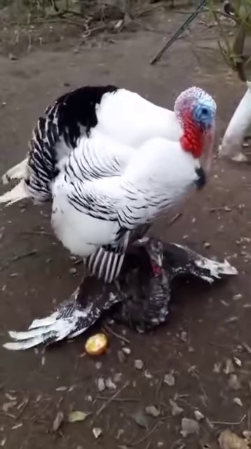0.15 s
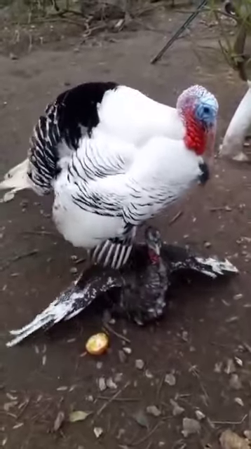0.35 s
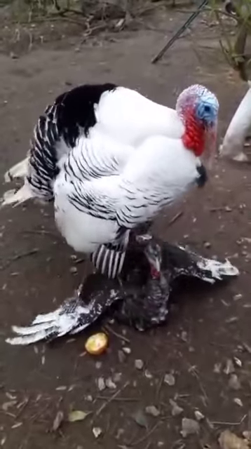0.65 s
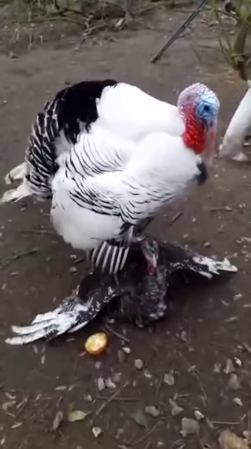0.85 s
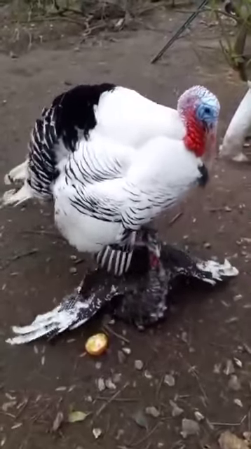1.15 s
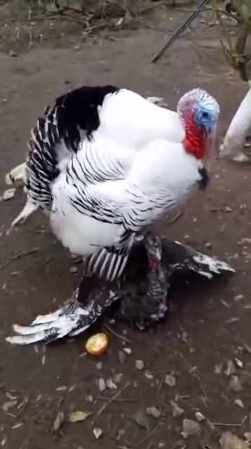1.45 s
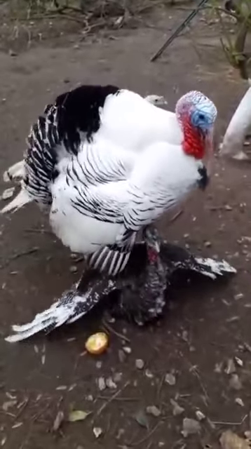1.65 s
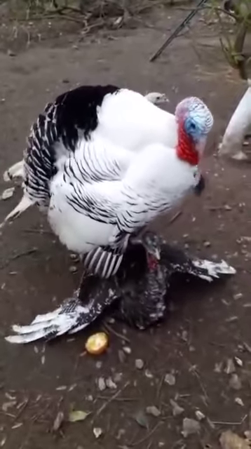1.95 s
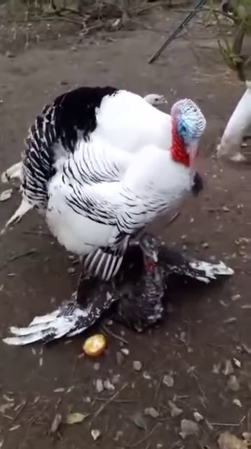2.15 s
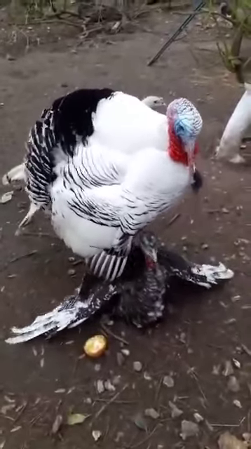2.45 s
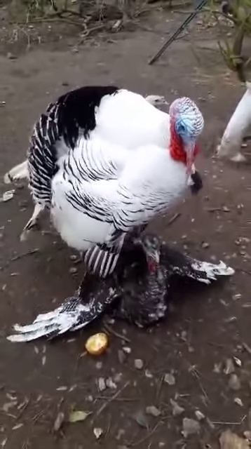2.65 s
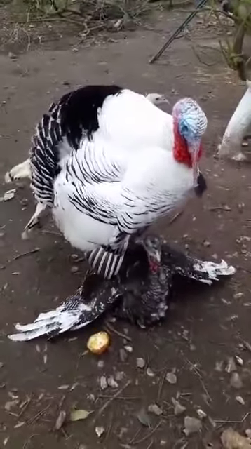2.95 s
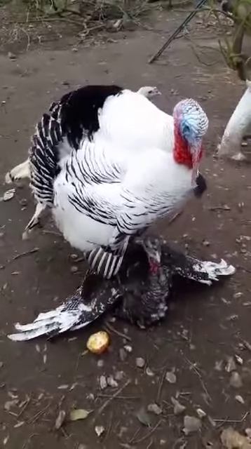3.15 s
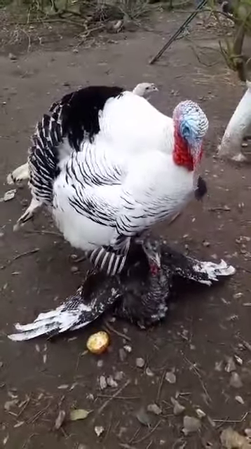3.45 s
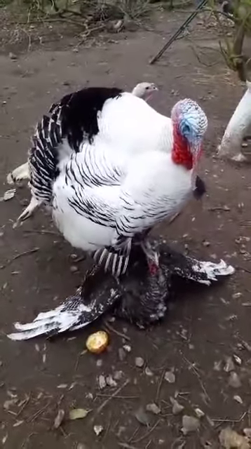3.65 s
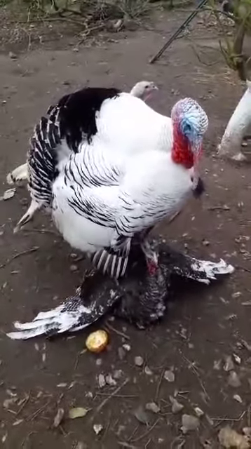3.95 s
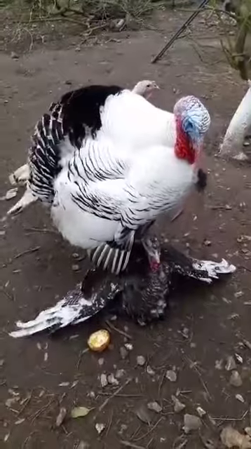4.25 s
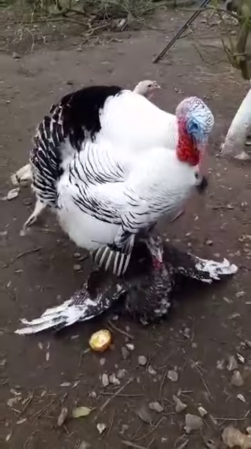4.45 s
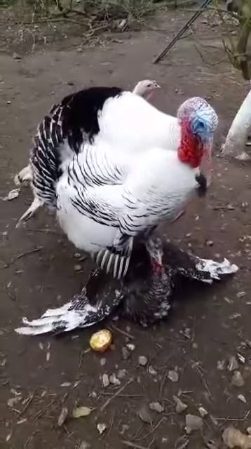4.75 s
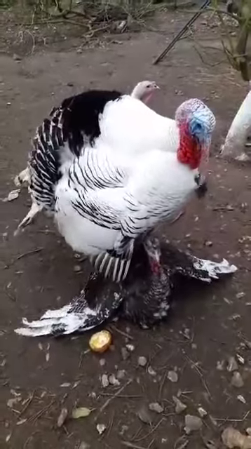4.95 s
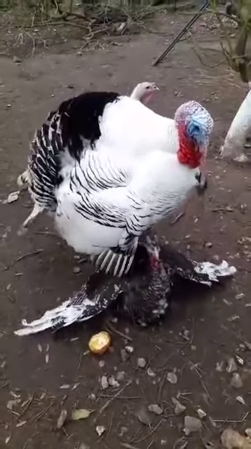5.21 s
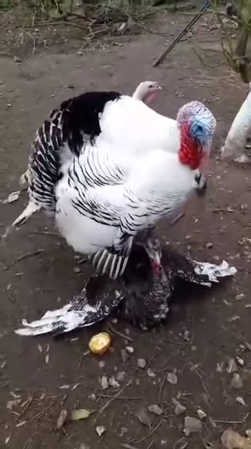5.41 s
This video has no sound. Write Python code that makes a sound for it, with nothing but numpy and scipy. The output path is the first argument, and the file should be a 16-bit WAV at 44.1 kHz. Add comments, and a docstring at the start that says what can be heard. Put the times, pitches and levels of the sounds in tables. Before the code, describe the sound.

Turkeys outdoors, picked up in stereo at close range with very little echo. Feathers brush and feet scuff gritty soil over a steady dull rumble. Isolated hen clucks snap upward and drop quickly, first low and hollow, later higher and more yelping. Soft muffled calls fill one gap. A dense, throaty group gobble erupts after three and a half seconds, stops abruptly, and three more clucks follow.

```python
"""Turkeys in an earthen yard, over a low outdoor rumble that lasts throughout.
First a distant bird whistles faintly downward while feathers rustle (shaped noise) and feet scuff (noise bursts).
Then a near hen clucks to the end: a gliding whistle whose overtones flare in fixed throat resonances, with rasp.
Between her clucks a farther hen calls softly in plain arches of pitch.
Late on, three toms gobble together: uneven pulses ring their throats while the fundamental hums in the chest."""
import sys
import numpy as np
from scipy import signal
from scipy.fft import rfft, irfft
from scipy.io import wavfile
from scipy.ndimage import uniform_filter1d

SR = 44100
rng = np.random.default_rng(int(sys.argv[2]) if len(sys.argv) > 2 else 0)


def master_out(mix):
    """Clip the mix to full scale and print it as 16-bit PCM to the path in sys.argv[1]."""
    frames = np.transpose(np.atleast_2d(mix))
    ceiling = np.clip(frames, -1, 1)
    pcm = np.round(ceiling * 32767).astype(np.int16)
    wavfile.write(sys.argv[1], SR, pcm)


N = 246078
CUTOFF_HZ = 15750   # nothing is kept above this

# Colour of the outdoor rumble. Each row: frequency in Hz, relative density in dB per Hz.
YARD_COLOUR = [(15, -83), (25, -56.5), (49, -1), (129, 1), (240, -8), (482, -9.5), (552, -10.5),
               (1110, -15), (1490, -16.5), (2300, -23), (2770, -27), (3000, -31), (4500, -36.5),
               (5430, -41), (15500, -47)]
YARD_DB = -47.5   # level of the part common to both sides, before its slow swell
# Likeness of the rumble on the two sides. Each row: frequency in Hz, likeness from 0 to 1.
YARD_LIKENESS = [(60, 1.0), (150, 1), (380, 0.91), (950, 0.33), (2380, 0.05), (5980, 0.05), (15000, 0.15)]

# A distant bird's thin whistle. One row: end in seconds, first pitch in Hz, last pitch in Hz, level in dB.
FAR_WHISTLE = (0.44, 2695, 2366, -67.5)

# Scuffs of feet. Each row: time in seconds, soil level in dB, treble level in dB, both before an offset.
SCUFFS = [(0.212, -30, -51.5), (0.596, -54, -47.5), (0.84, -33.5, -63), (2.21, -33, -60), (2.359, -52, -54),
          (2.737, -40, -49.5), (3.462, -34, -90), (4.733, -30.5, -62)]
# Sliding feathers. Each row: middle in seconds, half length in seconds, level in dB before its flutter.
RUSTLES = [(.4, 0.12, -53.5), (1.213, 0.1, -51), (1.662, 0.078, -56.5), (1.4, 0.11, -69), (.1, 0.2, -65.5)]
# Colour of sliding feathers. Each row: frequency in Hz, relative density in dB per Hz.
FEATHER_COLOUR = [(2000, -4), (3000, -1.5), (4700, 0.5), (6900, 1), (10500, -3), (12800, 4), (15500, -15.5)]
FEATHER_BED_DB = -73   # plumage never quite rests

# Effort of the gobble. Each row: time in seconds, throat level in dB, upper resonances level in dB,
# chest hum level in dB, all before the offsets of the tom's voice.
GOBBLE_EFFORT = [(3.66, -60, -71, -77), (3.688, -37.5, -50, -35), (3.72, -27, -40, -52),
                 (3.764, -34, -62, -29.5), (3.832, -47, -35.5, -54.5), (3.87, -18, -30.5, -36),
                 (3.96, -20, -35.5, -28), (4.034, -22, -35.5, -36), (4.05, -17.5, -30, -45.5),
                 (4.108, -18, -31, -33), (4.164, -19.5, -35, -38.5), (4.294, -15.5, -27.5, -29.5),
                 (4.346, -26.5, -44.5, -46), (4.428, -24.5, -27.5, -30.5), (4.458, -24, -45, -37),
                 (4.485, -45, -50, -49)]
# Arched gobble phrases, one list per tom. Each row: start in seconds, end in seconds, pulse rate in Hz at the
# start, in the middle and at the end, weight in dB against the other toms, roughness from 0 to 1.
TOM_PHRASES = [
    [(3.655, 3.735, 147.7, 160.2, 174.2, 0, 0.39), (3.735, 3.82, 160.2, 158, 151.9, -3, 0.4),
     (3.83, 4.03, 163.6, 177.6, 164.2, 0.5, 0.24), (4.02, 4.36, 165.7, 163.9, 168, -0.5, .55),
     (4.36, 4.48, 164, 179.8, 153.6, 1, 0.08)],
    [(3.84, 4.02, 187.8, 191.7, 184.4, -2, .5), (4.01, 4.19, 192.7, 208.7, 212.6, 0.5, .25),
     (4.19, 4.37, 194.7, 184.7, 167.1, 1.5, 0.12)],
    [(3.85, 4.08, 202.6, 208.3, 183.8, -12, 0.7), (4.08, 4.36, 177.9, 202.6, 198.8, -1, .5)],
]
PHRASE_FADE_S, WARBLE = .015, .012   # fade in and out; spread of the pulse rate, as a share
# Resonances of a tom's throat at the reference rate. Each row: frequency in Hz, width in Hz, level in dB.
TOM_THROAT = [(552.4, 37, -5), (789, 530, -4), (1080, 90, 6), (1400, 180, -13)]
THROAT_RATE_HZ, THROAT_FOLLOWS = 181.8, 0.37   # reference pulse rate; power by which resonances follow it
# Upper resonances of the first tom. Each row: frequency in Hz, width in Hz, level in dB.
FIRST_UPPER = [(1860, 165, 3.5), (2492, 135, 15.5), (4320, 290, -4), (8500, 380, -17)]
# Upper resonances of the other two toms. Each row: frequency in Hz, width in Hz, level in dB.
CHORUS_UPPER = [(1790, 440, -0.5), (2210, 164, 3), (2590, 61, 5), (3140, 230, -0.5), (4000, 1440, -9.5),
                (5220, 2730, -16.5), (8240, 630, -26), (12700, 2100, -35)]

# The near hen's clucks. Each row: start in seconds, climb in seconds, hold in seconds, length in seconds,
# held pitch in Hz, top of the arch in Hz, then levels in dB, before throat gain, of onset, climb, hold, arch,
# catch, tail, and last the rasp in dB before it builds and eases.
CLUCKS = [(1.178, .029, 0.027, 0.11, 1747, 1734, -8.5, -12, -7, -18.5, -21, -48, -32),
          (1.633, 0.022, .011, 0.071, 1822, 2326, -15, -15.5, -7, -19.5, -15, -26.5, -31),
          (2.831, .020, .008, .131, 1930, 3353, -9, -15, -8.5, -34.5, -32, -19, -30.5),
          (3.229, .015, 0.007, .106, 1870, 3205, -12, -15, -20, -56.5, -50, -28.5, -39),
          (3.732, 0.013, .007, .134, 2028, 3717, -23, -12.5, -9, -20.5, -20, -14.5, -29.5),
          (4.054, .006, 0.0086, .04, 1900, 2800, -26, -25, -22.5, -17, -18, -35, -36),
          (4.365, .016, .003, .04, 1536, 1600, -33, -15, -39, -53, -44, -50, -38.5),
          (4.843, .010, 0.0057, .134, 2033, 3780, -10, -11.5, -6.5, -19, -7.5, -17.5, -27),
          (5.197, 0.011, 0.005, .112, 2009, 3606, -22, -13, -3, -19, -21.5, -17.5, -25),
          (5.506, 0.014, 0.0052, .112, 1900, 3320, -13.5, -17.5, -18.5, -58, -59, -51, -34.5)]
# Calls of a farther hen. Each row: start in seconds, length in seconds, edge pitch in Hz, top pitch in Hz,
# edge level in dB, middle level in dB, both before throat gain, dip and flutter.
SOFT_CALLS = [(2.593, 0.038, 1080, 1130, -45, -39), (2.699, 0.15, 1500, 1560, -44.5, -38.5),
              (2.9, .093, 768, 1280, -24.5, -32), (3.031, .121, 735, 1590, -22, -36.5)]
# Resonances of a hen's throat. Each row: frequency in Hz, gain in dB.
HEN_THROAT = [(500, -4.5), (900, -9), (1100, -10.5), (1420, -0.5), (1600, -13.5), (1850, 1), (2050, -7),
              (2300, -13), (2700, -5.5), (3500, -18.5), (4200, -13.5), (5500, -26.5), (8000, -35.5),
              (13000, -38.5)]
# Colour of air through that throat. Each row: frequency in Hz, relative density in dB per Hz.
RASP_COLOUR = [(500, -18), (950, -4.5), (1250, 0), (1500, 2.5), (1950, 6), (2300, -7.5), (2800, -5),
               (4200, -17.5), (5600, -21.5), (7500, -43.5), (9000, -26.5), (15000, -39)]
# The open throat rings with passing air from the snap until about the end of the cluck.
# Each row: start in seconds, end in seconds, relaxed lower resonance in Hz, relaxed upper resonance in Hz,
# level in dB before the lower one's gain.
THROAT_RINGS = [(1.665, 1.735, 1540, 2256, -49), (2.859, 2.975, 868, 1746, -41),
                (3.239, 3.312, 800, 1620, -47.5), (3.752, 3.853, 960, 1924, -34),
                (4.85, 5.001, 984, 1920, -43), (5.215, 5.3, 1170, 1946, -40.5),
                (5.519, 5.567, 908, 1900, -45.5)]

# A cluck's climb breaks through two registers before the held note; the arch then sinks ever faster.
START_HZ, LOW_REGISTER_HZ, MIDDLE_REGISTER_HZ, END_HZ = 783, 930, 1393.5, 576
LOW_SHARE, REGISTER_RISE = .36, 0.063   # share of the climb spent low; pitch rise either side of the middle
BREAK_S, SWING_S, ARCH_POWER = 0.0023, .004, 2.2   # register jump; swing into the arch; arch flatness
ATTACK_DB, ARCH_SAG_DB, END_DB = 19, 3, 0.5   # rise at the start; sag along the arch; fade at the end
CATCH_HZ, CATCH_S, CATCH_EARLIEST = 1950, 0.008, .45   # pitch of the catch; half length; least arch share
ARCH_WAVER, ARCH_WAVER_S = .025, .003   # pitch turns unsteady after the held note: share; step
RASP_BUILDS_DB, RASP_BUILDS_S = 9, .004   # the rasp builds up with the air pressure
RASP_EASES_DB = 10   # the rasp eases after the held note
# Soft calls: flatness of the arch; thinning on the shoulders per octave of glide; rasp; flutter and its step.
SOFT_FLATNESS, SOFT_DIP_DB, SOFT_RASP_DB = 1.6, 14.5, -57
SOFT_FLUTTER_DB, SOFT_FLUTTER_S = 6.5, .006

# The near hen's early place at two microphone ports.
# Each row: frequency in Hz, left minus right in dB, left lead in radians, both fading out in the bass.
EARLY_HEN_PORTS = [(500, 2, 0), (900, -1.5, -0.67), (1390, -2, -1.2), (1900, 1, -0.55), (2800, 1, 1.5),
                   (9000, 2, 0.77)]
# The hens' later place. Each row: frequency in Hz, left minus right in dB, left lead in radians, faded likewise.
HEN_PORTS = [(500, 3, 0.37), (900, 1, -0.77), (1300, -3.5, -1.09), (2000, -4.5, 0.55), (2800, 4, 1.45),
             (3740, 0, 1.4), (9000, 0, 0.583)]
# The first tom's place. Each row: frequency in Hz, left minus right in dB, left lead in radians, faded likewise.
FIRST_PORTS = [(200, -11, 1), (600, 10.5, -0.85), (1002, 0.5, -1.13), (1500, 1, -1.6), (2500, 3, -1.93),
               (9000, 2, -3.1)]
# The second tom's place. Each row: frequency in Hz, left minus right in dB, left lead in radians, faded likewise.
SECOND_PORTS = [(200, 27, -1.4), (990, -7, 1), (1410, -0.5, -1.8), (2500, -0.5, -1.96), (8900, 1, -0.39)]
# The third tom's place. Each row: frequency in Hz, left minus right in dB, left lead in radians, faded likewise.
THIRD_PORTS = [(600, -0.5, -0.054), (1000, 6, 1), (1400, 1, -1.9), (2500, 10.5, -1.1), (9000, -3, -0.63)]


def from_db(db):
    """Logarithmic level: decibels to amplitude gain."""
    return 10 ** (np.asarray(db) / 20)


def rms_one(x):
    """Normalization: scale to unit power."""
    return x / np.sqrt(np.mean(x ** 2) + 1e-20)


def in_time(rows):
    """Linear interpolation: each column of a curve at every sample."""
    s, *columns = np.transpose(rows)
    return [np.interp(np.arange(N) / SR, s, c) for c in columns]


def at_hz(points, hz, axis=1):
    """Logarithmic frequency: one column of a spectrum, interpolated on that axis."""
    points = np.array(points)
    return np.interp(np.log(hz + 1), np.log(points[:, 0]), points[:, axis])


def bins():
    """Fourier analysis: the frequencies of a full-length spectrum."""
    return np.arange(N // 2 + 1) * SR / N


def drift(rate):
    """Low-passed chance: fluctuation of spread 1, weakening above the rate in Hz."""
    spectrum = rfft(rng.standard_normal(N)) / (1 + (bins() / rate) ** 2)
    return rms_one(irfft(spectrum, N))


def noise(colour):
    """Spectral shaping: white noise weighted to a colour, rms 1."""
    spectrum = rfft(rng.standard_normal(N)) * from_db(at_hz(colour, bins()))
    return rms_one(irfft(spectrum, N))


def band(x, low_hz, high_hz):
    """Band limitation: a gentle Butterworth band-pass."""
    edges = [low_hz, min(high_hz, SR / 2 - 1)]
    return signal.sosfilt(signal.butter(2, edges, "band", fs=SR, output="sos"), x)


def resonate(x, modes):
    """Modal superposition: parallel damped resonances with alternating signs."""
    out = 0
    for k, (hz, width, db) in enumerate(modes):
        r = np.exp(-np.pi * width / SR)   # pole radius
        gain = (-1) ** k * from_db(db) * (1 - r * r) / 2
        out = out + gain * signal.lfilter([1, 0, -1], [1, -2 * r * np.cos(2 * np.pi * hz / SR), r * r], x)
    return out


def even(x, size=1300):
    """Power levelling: divide by the running rms over a few pulses."""
    return x / np.sqrt(np.abs(uniform_filter1d(x * x, size)) + 1e-12)


def ports(x, table):
    """Diffraction: the microphone body shades and delays each side differently; long waves reach both alike."""
    short = 1 - np.exp(-(bins() / 500) ** 2)
    shade = from_db(short * at_hz(table, bins()) / 2)
    half = shade * np.exp(.5j * short * at_hz(table, bins(), axis=2))
    return irfft(rfft(x) * np.array([half, 1 / half]), N)


def scatter(x, t60, wet_db):
    """Reverberation: ground, fences and trunks scatter sound back, differently to each side."""
    t = np.arange(SR // 2) / SR
    tail = band(rng.standard_normal((2, len(t))), 270, 6000) * from_db(-60 * t / t60) * (t > .002)
    tail /= np.sqrt((tail ** 2).sum(axis=1, keepdims=True))
    return from_db(wet_db) * signal.fftconvolve(x, tail, axes=1)[:, :N]


def disperse(x):
    """Dispersion: short waves detour a few milliseconds round bodies and ground, smearing each pulse."""
    hz = bins()
    detour_s = np.array([np.interp(hz, np.arange(200) * 120, rng.uniform(0, .008, 200)) for _ in x])
    detour_s *= np.clip((hz - 1600) / 800, 0, 1)
    # phase is the running sum of group delay over frequency
    return irfft(rfft(x) * np.exp(-2j * np.pi * np.cumsum(detour_s, axis=1) * SR / N), N)


def outdoors(swell_db=2.5):
    """Spatial coherence: distant rumble and air, alike on both sides in the bass, slowly swelling."""
    alike = np.clip(at_hz(YARD_LIKENESS, bins()), 0, 1)
    side = irfft(rfft(noise(YARD_COLOUR)) * np.sqrt((1 - alike) / (1 + alike)), N)
    level = from_db(YARD_DB + swell_db * drift(0.9))
    return level * (noise(YARD_COLOUR) + side * np.array([[1], [-1]]))


def far_bird():
    """Frequency glide: a faint falling sine whistle from beyond the yard."""
    end, first_hz, last_hz, level_db = FAR_WHISTLE
    t = np.arange(N) / SR
    phase = 2 * np.pi * np.cumsum(np.interp(t, [0, end], [first_hz, last_hz])) / SR
    return np.sqrt(2) * from_db(level_db) * np.sin(phase) * (t < end)


def shuffling(rise_s=0.0065, soil_db=-15.5, grit_db=-6.5):
    """Friction noise: feet scuff the gritty soil and stiff feathers slide over each other."""
    t, out = np.arange(N) / SR, 0
    soil = rms_one(band(rng.standard_normal(N), 650, 1880))
    grit = rms_one(band(rng.standard_normal((2, N)), 2700, 15000)) * from_db(2 * drift(300))
    for s, level_db, treble_db in SCUFFS:
        age = np.clip((t - s) / rise_s + .5, 0, 50)   # in rise times
        scuff = soil * from_db(level_db + soil_db) + grit * from_db(treble_db + grit_db)
        out = out + age * np.exp(1 - age) * scuff
    swells = sum(from_db(level_db) * np.exp(-((t - s) / half_s) ** 2) for s, half_s, level_db in RUSTLES)
    sliding = (from_db(FEATHER_BED_DB) + swells) * from_db(1.6 * drift(60))
    return out + sliding * np.array([noise(FEATHER_COLOUR), noise(FEATHER_COLOUR)])


def phrasing(phrases):
    """Frequency modulation: one tom's pulse rate follows a parabola per phrase; also his weight and roughness."""
    t = np.arange(N) / SR
    hz, weight, rough = np.full(N, float(phrases[0][2])), np.zeros(N), np.zeros(N)
    for start, end, first_hz, middle_hz, last_hz, weight_db, roughness in phrases:
        u = np.clip((t - start) / (end - start), 0, 1)
        bulge_hz = 2 * middle_hz - first_hz - last_hz
        arch = first_hz + (last_hz - first_hz) * u + bulge_hz * 2 * u * (1 - u)
        hz, rough = np.where(t > start, arch, hz), np.where(t > start, roughness, rough)
        fade = np.clip(np.minimum(t - start, end - t) / PHRASE_FADE_S + .5, 0, 1)
        weight = np.maximum(weight, from_db(weight_db) * fade)
    return hz * (1 + WARBLE * drift(25)), weight, rough


def tightening(x, pulse_hz):
    """Time-warped resonance: a tom's throat tightens as his pitch rises, carrying its resonances up and down."""
    steady = np.arange(N)
    clock = np.cumsum((pulse_hz / THROAT_RATE_HZ) ** np.clip(THROAT_FOLLOWS, 0, 1))
    return np.interp(clock, steady, resonate(np.interp(steady, clock, x), TOM_THROAT))


def tom(pulse_hz, rough, upper_modes, rattle_db=8.5, throat_db=1.5, upper_db=4.0, hum_db=0.0,
        second_db=-15.0, third_db=-9.5):
    """Source and filter: uneven pulses with puffs of air ring the throat; their fundamental hums in the chest."""
    throat_level, upper_level, hum_level = in_time(GOBBLE_EFFORT)
    rough = np.clip(rough, 0, 1)
    cycles = np.cumsum(pulse_hz * (1 + .022 * rough * drift(90))) / SR
    rattle = from_db(rattle_db * rough * drift(120))
    pulses = np.diff(np.floor(cycles), prepend=0) * rattle
    puffs = .025 * rough * rattle * np.exp(-3 * (cycles % 1)) * rng.standard_normal(N)
    source = pulses + puffs
    throat = even(band(tightening(source, pulse_hz), 690, 1900))
    hiss = 4 * band(puffs, 3200, 15000)
    upper = even(band(resonate(source + hiss, upper_modes), 1500, 14000))
    second = from_db(second_db) * np.sin(4 * np.pi * cycles)
    third = from_db(third_db) * np.sin(6 * np.pi * cycles)
    chest = np.sqrt(2) * (np.sin(2 * np.pi * cycles) + (second + third) * rattle)
    # the shaking neck chops the voice into quick syllables
    shake = from_db(4.5 * rough * np.sin(2 * np.pi * np.cumsum(30 + 8 * drift(12)) / SR))
    voice = throat * from_db(throat_level + throat_db) + upper * from_db(upper_level + upper_db)
    return voice * shake / np.sqrt(1 + rough / 2) + chest * from_db(hum_level + hum_db)


def gobble():
    """Beating: three toms at different pulse rates share the power; the first starts and ends alone."""
    t, out = np.arange(N) / SR, 0
    sounding = np.clip(np.minimum(t - GOBBLE_EFFORT[0][0], GOBBLE_EFFORT[-1][0] - t) / 0.0017, 0, 1)
    toms = [phrasing(phrases) for phrases in TOM_PHRASES]
    total = np.sqrt(sum(weight ** 2 for _, weight, _ in toms) + 1e-6)
    uppers = (FIRST_UPPER, CHORUS_UPPER, CHORUS_UPPER)
    places = (FIRST_PORTS, SECOND_PORTS, THIRD_PORTS)
    for (hz, weight, rough), upper, place in zip(toms, uppers, places):
        out = out + ports(tom(hz, rough, upper) * sounding * weight / total, place)
    return out


def soft_call(start, length, edge_hz, top_hz, edge_db, middle_db):
    """Pitch arch: a plain rise and fall, thin on the shoulders: (s, pitch Hz, whistle dB, rasp dB)."""
    age = np.arange(int(length * SR)) / SR
    edge = np.abs(2 * age / length - 1) ** SOFT_FLATNESS   # 1 at both ends, 0 in the middle
    dip_db = SOFT_DIP_DB * np.log2(top_hz / edge_hz) * np.sin(np.pi * np.sqrt(edge)) ** 2
    # the weak tone is unsteady
    flutter_db = SOFT_FLUTTER_DB * np.interp(age / SOFT_FLUTTER_S, np.arange(50), rng.standard_normal(50))
    pitch = top_hz + (edge_hz - top_hz) * edge
    whistle_db = middle_db + (edge_db - middle_db) * edge - dip_db + flutter_db
    return start + age, pitch, whistle_db, np.full(len(age), SOFT_RASP_DB)


def cluck(start, climb, hold, length, held_hz, top_hz, onset_db, climb_db, hold_db, arch_db, catch_db,
          tail_db, rasp_db):
    """Register breaks: climb in jumps, hold, arch, catch in the fall: (s, pitch Hz, whistle dB, rasp dB)."""
    age = np.arange(int(length * SR)) / SR
    low, leave = LOW_SHARE * climb, climb + hold
    half = BREAK_S / 2
    steps = np.maximum.accumulate([0, low - half, low + half, climb - half, climb + half])
    middle_start_hz = MIDDLE_REGISTER_HZ * (1 - REGISTER_RISE)
    middle_end_hz = MIDDLE_REGISTER_HZ * (1 + REGISTER_RISE)
    hz = np.interp(age, steps, [START_HZ, LOW_REGISTER_HZ, middle_start_hz, middle_end_hz, held_hz])
    since, span = np.maximum(0, age - leave), max(length - leave, BREAK_S)
    loose = 1 - np.exp(-since / SWING_S)   # 0 on the held note, towards 1 on the arch
    hz = hz + (top_hz - held_hz) * loose - (top_hz - END_HZ) * (since / span) ** ARCH_POWER
    # the falling tone catches with a second snap where the arch passes CATCH_HZ, or at the earliest share
    crossing = (max(top_hz - CATCH_HZ, 0) / (top_hz - END_HZ)) ** (1 / ARCH_POWER)
    catch = leave + span * max(CATCH_EARLIEST, crossing)
    stages, levels = np.transpose([
        (0, onset_db - ATTACK_DB), (low / 2, onset_db),
        (steps[2], climb_db), (steps[3], climb_db),
        (steps[4], hold_db), (leave - half, hold_db),
        (leave + SWING_S, arch_db), (catch - CATCH_S, arch_db - ARCH_SAG_DB),
        (catch, catch_db), (catch + CATCH_S, tail_db), (length, tail_db - END_DB)])
    whistle_db = np.interp(age, np.maximum.accumulate(stages), levels)
    waver = loose * np.interp(age / ARCH_WAVER_S, np.arange(100), rng.standard_normal(100))
    pitch = np.maximum(hz, END_HZ) * (1 + ARCH_WAVER * waver)
    air_db = rasp_db - RASP_EASES_DB * loose - RASP_BUILDS_DB * np.exp(-age / RASP_BUILDS_S)
    return start + age, pitch, whistle_db, air_db


def throat_rings(lower_db=1.0, lower_sag=0.19, upper_sag=.1, relax_s=0.024):
    """Driven resonance: air keeps two narrow modes sounding; both sink as the throat relaxes after the snap."""
    t, out = np.arange(N) / SR, np.zeros(N)
    breathy = [1 + .45 * (drift(70) + 1j * drift(70)) for _ in range(2)]   # wavers in level and phase
    sags, gains = (lower_sag, upper_sag), (from_db(lower_db), 1)
    for start, end, lower_hz, upper_hz, level_db in THROAT_RINGS:
        at = np.flatnonzero((t > start) & (t < end))
        tense = np.exp(-(t[at] - start) / relax_s)
        fade = np.minimum(1, np.minimum(t[at] - start, end - t[at]) / .004)
        for hz, sag, gain, air in zip((lower_hz, upper_hz), sags, gains, breathy):
            phase = 2 * np.pi * np.cumsum(hz * (1 + sag * tense)) / SR
            out[at] += from_db(level_db) * gain * fade * np.real(air[at] * np.exp(1j * phase))
    return out


def hen(calls, overtone_db, slack_db=8.5, waver=0.0035, flutter_db=3.0, rasp_db=0.0, attack_s=0.0054,
        release_s=0.013):
    """Formant filtering: each overtone of a gliding whistle flares as it crosses a resonance; air rasps along."""
    out, air = np.zeros(N), from_db(rasp_db) * noise(RASP_COLOUR)
    unsteady, flutter = 1 + waver * drift(250), flutter_db * drift(110)
    k = np.arange(1, 7)[:, None]   # harmonic numbers
    for s, hz, whistle_db, air_db in calls:
        at = np.arange(int(s[0] * SR), min(int((s[-1] + 5 * release_s) * SR), N))
        t = at / SR
        pitch = np.interp(t, s, hz) * unsteady[at]
        phase = 2 * np.pi * np.cumsum(pitch) / SR
        slack = np.exp(-(pitch / 1100) ** 6)
        buzz_db = slack_db * slack * (k == 2)   # a slack membrane adds a strong octave, a taut one whistles
        gains_db = at_hz(HEN_THROAT, k * pitch) + overtone_db * np.log2(k) + buzz_db
        gains = from_db(gains_db) * (k * pitch < CUTOFF_HZ)
        gains = uniform_filter1d(gains, size=50, axis=1)   # a resonance needs a millisecond to build up
        strain = (pitch / 3000) ** 2   # the tone breaks up as the pitch gets high
        level = from_db(np.interp(t, s, whistle_db) + strain * flutter[at])
        whistle = np.sqrt(2) * (gains * np.sin(k * phase)).sum(axis=0) * level
        rasp = air[at] * from_db(np.interp(t, s, air_db))
        rise = np.minimum(1, (t - t[0]) / attack_s)
        fall = np.exp(-np.maximum(0, t - s[-1] + release_s / 2) / release_s)
        out[at] += rise * fall * (fall ** 2 * whistle + rise ** 2 * rasp)   # the air outlasts the tone
    return out


def scene():
    """Superposition: all the birds in their yard, with its echo and rumble."""
    # the hen walks on between her calls
    early = [cluck(*c) for c in CLUCKS if c[0] < 2]
    late = [cluck(*c) for c in CLUCKS if c[0] >= 2]
    soft = [soft_call(*c) for c in SOFT_CALLS]
    early_hen = ports(hen(early, overtone_db=-10.0), EARLY_HEN_PORTS)
    late_voices = hen(late, overtone_db=-13.0) + hen(soft, overtone_db=-41.0) + throat_rings()
    hens = early_hen + ports(late_voices, HEN_PORTS)
    toms = disperse(gobble())
    birds = hens + toms + scatter(toms, t60=.04, wet_db=-15.0)
    echo = scatter(birds, t60=.2, wet_db=-31.0)
    return birds + echo + far_bird() + shuffling() + outdoors()


def record(dry):
    """Low-pass filtering: an elliptic filter cuts the top steeply."""
    return signal.sosfilt(signal.ellip(10, .1, 80, CUTOFF_HZ, fs=SR, output="sos"), dry)


dry = scene()
out = record(dry)
master_out(out)
```